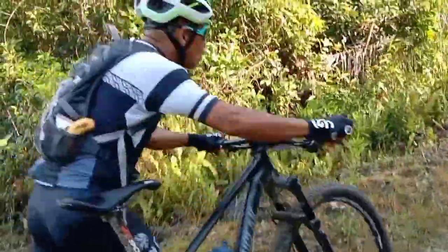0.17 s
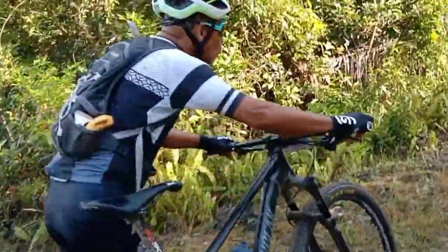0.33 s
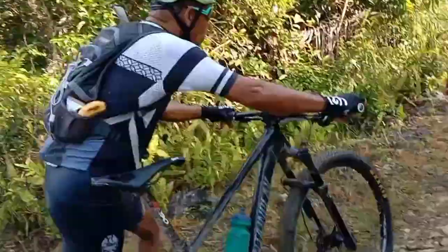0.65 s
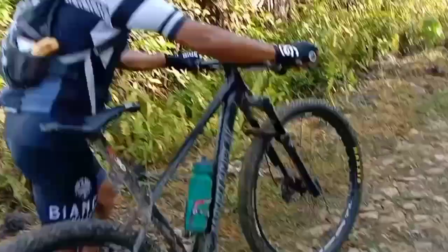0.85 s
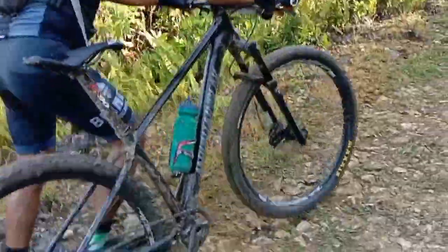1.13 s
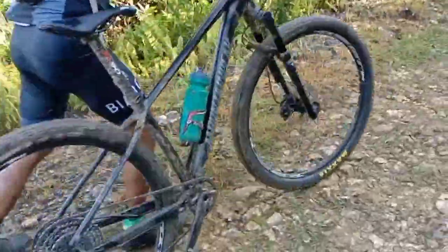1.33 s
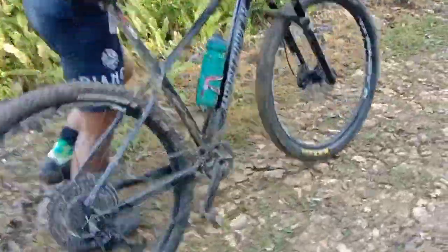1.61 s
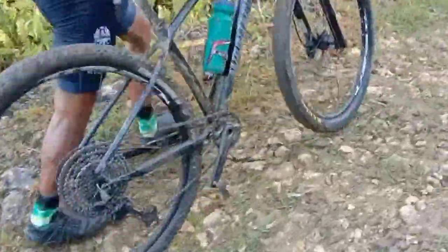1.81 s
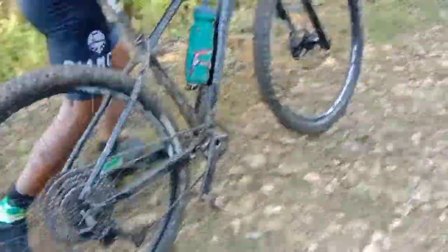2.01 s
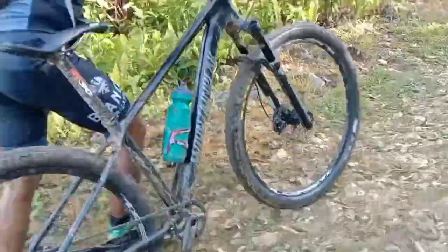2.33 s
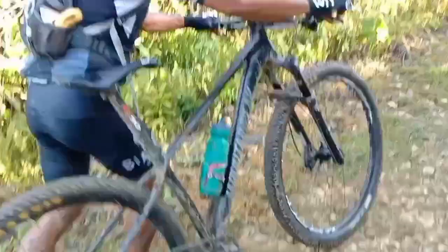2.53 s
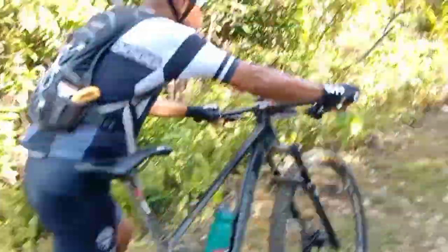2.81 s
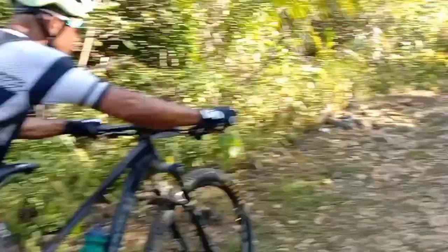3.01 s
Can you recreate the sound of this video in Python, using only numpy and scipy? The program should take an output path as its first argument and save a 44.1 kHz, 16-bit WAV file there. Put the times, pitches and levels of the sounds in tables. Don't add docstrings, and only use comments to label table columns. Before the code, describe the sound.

A bicycle freewheel clicks steadily and close from the start, bright and metallic, with small stones crunching, a few knocks and one loud rock crack near two seconds, over insect hiss outdoors.

```python
import sys
import numpy as np
from scipy import signal
from scipy.io import wavfile

SR = 44100
rng = np.random.default_rng(int(sys.argv[2]) if len(sys.argv) > 2 else 0)


def boost(x):
    u = np.asarray(x, float) / 20
    return 10 ** u


def to_wav(sig):
    pcm = np.clip(np.atleast_2d(sig), -1, 1) * 32767
    pcm = np.round(pcm).astype(np.int16)
    wavfile.write(sys.argv[1], SR, pcm.T)


N = 138915
GRAIN = 4096


def rms_one(x):
    return x / np.sqrt(np.mean(x ** 2) + 1e-20)


def butter(x, order, hz, kind):
    return signal.sosfilt(signal.butter(order, hz, kind, fs=SR, output="sos"), x)


def drift(rate):
    r = np.exp(-80 * np.pi * rate / SR)
    slow = signal.lfilter([1], [1, -2 * r, r * r], rng.standard_normal(N // 40 + 2002))[2000:]
    return np.interp(np.arange(N) / 40, np.arange(len(slow)), rms_one(slow))


def pole(x, tau_s):
    return signal.lfilter([1], [1, -np.exp(-1 / (max(tau_s, 2e-5) * SR))], x + 1e-18)


def burst(s, db, rise_s, fall_s):
    clicks = np.zeros(N)
    np.add.at(clicks, (np.asarray(s) * SR).astype(int), boost(db))
    return np.abs(pole(clicks, fall_s) - pole(clicks, min(rise_s, 0.5 * fall_s)))


def crunch(noise, rise_s, fall_s):
    t = np.arange(len(noise)) / SR
    return noise * (np.exp(-t / fall_s) - np.exp(-t / min(rise_s, 0.5 * fall_s)))


def place(out, s, db, sound):
    start = int(s * SR)
    out[start:start + GRAIN] += boost(db) * sound / np.abs(sound).max()


def peak(x, hz, width_hz):
    r = np.exp(-np.pi * width_hz / SR)
    top = np.array([1, 0, -1]) * (1 - r * r) / 2
    return signal.lfilter(top, [1, -2 * r * np.cos(2 * np.pi * hz / SR), r * r], x)


def ring(x, hz, t60):
    r, w = boost(-60 / (t60 * SR)), 2 * np.pi * hz / SR
    return signal.lfilter([0, np.sin(w)], [1, -2 * r * np.cos(w), r * r], x + 1e-18)


def coloured(spectrum, patchy_db):
    hz, db = np.transpose(spectrum)
    white, shared = rng.standard_normal((2, N + 8192)), drift(12)
    edges = np.geomspace(hz[0], hz[-1], int(4 * np.log2(hz[-1] / hz[0])) + 2)
    out = 0
    for k, (low, high) in enumerate(zip(edges, edges[1:])):
        band = butter(white[k % 2], 3, [low, high], "band")[8192:]
        level_db = np.interp(np.log(low * high) / 2, np.log(hz), db)
        out = out + band * boost(level_db + patchy_db * (1.1 * shared + drift(9.0)))
    return rms_one(out)


def struck(modes, t60, s, db, rise_s, fall_s):
    scatter_db = 4.5 * rng.standard_normal((len(s), len(modes)))
    chatter = rng.standard_normal(N) * boost(3.8 * drift(150)) / np.sqrt(fall_s * SR / 2)
    out = np.zeros(N)
    for k, (hz, level_db) in enumerate(modes):
        blows = burst(s, db + level_db + scatter_db[:, k], rise_s, fall_s)
        out += ring(chatter * blows, hz, t60)
    return out


# f/Hz, level/dB [per Hz]
AIR = [(22, -32), (60, -14), (110, -5), (300, -8.5), (800, -11), (2000, -6.5), (3200, -20.5), (4300, -16)]
# f/Hz, level/dB [per Hz]
CHORUS = [(4400, -54), (5100, 1), (7000, 6), (8500, -3.5), (10500, -5), (16000, -18)]


def air():
    return boost(-62) * coloured(AIR, patchy_db=1.7) + boost(-49.5) * coloured(CHORUS, patchy_db=2.8)


# t/s, level/dB
INSECTS = [
    (0, -49),
    (1.1, -50.5),
    (1.5, -61),
    (2.3, -64),
    (3.15, -56),
]


def insects():
    high_hz, low_hz, width_hz = 7660, 5690, 240
    s, db = np.transpose(INSECTS)
    high, low = (rms_one(peak(peak(rng.standard_normal(N), hz, width_hz), hz, width_hz))
                 for hz in (high_hz, low_hz))
    high_db = np.interp(np.arange(N) / SR, s, db) + 2.5 * drift(34)
    return high * boost(high_db) + low * boost(-58.5 + 3 * drift(30))


# t/s, peak level/dB, rim level/dB [relative], rim f/Hz
TICKS = [(0.026, -17, -22, 2773), (0.1054, -13, -26, 3250), (0.1766, -17, -20.5, 1980),
         (0.2495, -15, -20, 2210), (0.3177, -14.5, -22.5, 2770), (0.3882, -13.5, -28.5, 2540),
         (0.4504, -15.5, -26.5, 2690), (0.506, -16, -23, 2240), (0.562, -16, -21, 3060),
         (0.6275, -16.5, -21.5, 2270), (0.6971, -16.5, -24.5, 2687), (0.7722, -16.5, -23.5, 2146),
         (0.845, -15.5, -22, 2193), (0.928, -17.5, -22.5, 3070), (1.022, -15, -27, 2243),
         (1.1165, -16.5, -25.5, 2660), (1.197, -15, -25.5, 3270), (1.2834, -14.5, -38.5, 2650),
         (1.3603, -16.5, -30, 2660), (1.4278, -14.5, -24.5, 2335), (1.5, -13.5, -30, 2625),
         (1.574, -16.5, -22, 2240), (1.6511, -11.5, -36, 2920), (1.7379, -13.5, -31, 2310),
              (1.8242, -14.5, -25, 2180), (1.91, -13.5, -28.5, 3480), (1.9941, -13, -29.5, 2760),
              (2.0772, -14.5, -23.5, 2740), (2.168, -13.5, -27, 2560), (2.268, -16.5, -29, 2240),
              (2.3585, -18.5, -20, 3200), (2.4474, -16, -42, 2180), (2.5222, -16, -25.5, 3220),
              (2.594, -15, -29.5, 2330), (2.6599, -13.5, -21, 2296), (2.7359, -18.5, -23, 2870),
              (2.8176, -17, -22, 2300), (2.9021, -15.5, -23.5, 2294), (2.989, -15.5, -22, 3090),
              (3.081, -16, -23.5, 2960)]
# t/s, peak level/dB
DRAGS = [(0.134, -47), (0.298, -27.5), (0.423, -47), (0.53, -31), (0.601, -23.5), (0.664, -24.5),
         (0.748, -25.5), (.875, -34), (.950, -53), (1.051, -25), (1.228, -36), (1.264, -29), (1.402, -31),
         (1.599, -41), (1.63, -26), (1.81, -28), (1.867, -26), (1.963, -27.5), (2.062, -24), (2.190, -56),
         (2.347, -26.5), (2.424, -30), (2.508, -24), (2.637, -47), (2.75, -55), (2.863, -28), (2.880, -37),
         (3.105, -47)]
# t/s, peak level/dB
REBOUNDS = [(.007, -31.5), (0.069, -26), (.136, -22.5), (0.2, -24), (.210, -26), (0.265, -23.5),
            (0.289, -34), (0.446, -25), (0.525, -26), (0.614, -23), (.720, -38), (.739, -31),
            (0.878, -33.5), (.947, -30), (.969, -54), (1.067, -32), (1.146, -29), (1.323, -33),
            (1.513, -40), (1.601, -24), (1.681, -27), (1.691, -28.5), (1.774, -27.5), (1.874, -34),
            (1.931, -31), (1.973, -27), (2.109, -31), (2.189, -37), (2.544, -33), (2.639, -26),
            (2.75, -19.5), (2.865, -30), (2.881, -33), (2.956, -27), (2.976, -24), (3.031, -30),
            (3.106, -23.5)]
# f/Hz, level/dB
HUB = [(5150, 0), (5600, 2), (6300, -3), (6950, 8), (7400, -3), (9550, 9), (11200, 6), (13400, -3),
       (13990, 4), (14700, -3)]
# f/Hz, level/dB
RIM = [(2230, 6.5), (2680, 1.5), (3200, -5.5), (3750, 0.5)]
# f/Hz, level/dB [per Hz]
CRACK = [(1500, -46), (3500, -12), (4500, -66), (5050, -0.5), (7000, 4), (10500, -1), (14200, 5),
         (16000, 5.5)]


def freewheel():
    snap_rise_s, snap_fall_s, drag_rise_s, drag_fall_s = 0.00029, 0.0043, 0.0019, 0.012
    rim_rise_s, rim_fall_s, rebound_fall_s = 0.0023, 0.013, 0.0046
    crack_db, hub_db, hub_t60_s, spoke_width_hz = -10.5, -29, 0.03, 45
    s, db, rim_db, rim_hz = np.transpose(TICKS)
    drag_s, drag_db = np.transpose(DRAGS)
    again_s, again_db = np.transpose(REBOUNDS)

    shape = burst(s, db + crack_db, snap_rise_s, snap_fall_s)
    shape += burst(s, db - 25, snap_rise_s, 0.027)
    shape += burst(drag_s, drag_db + crack_db, drag_rise_s, drag_fall_s)
    shape += burst(again_s, again_db + crack_db, snap_rise_s, rebound_fall_s)
    crack = shape * boost(1.5 * drift(200)) * coloured(CRACK, patchy_db=0.7)

    hub = struck(HUB, hub_t60_s, s, db + hub_db, snap_rise_s, snap_fall_s)
    hub += struck(HUB, hub_t60_s, drag_s, drag_db + hub_db, drag_rise_s, drag_fall_s)
    rim = struck(RIM, 0.061, s, db + rim_db - 10.5, rim_rise_s, rim_fall_s)

    spokes = np.zeros(N + GRAIN)
    for start, level_db, hz, noise in zip(s, db + rim_db - 5, rim_hz, rng.standard_normal((len(s), GRAIN))):
        shake = peak(crunch(noise, rim_rise_s, rim_fall_s), hz, spoke_width_hz)
        place(spokes, start, level_db, peak(shake, hz, 3 * spoke_width_hz))

    grain = rms_one(butter(rng.standard_normal(N), 3, [1760, 3800], "band"))
    shakes = burst(s, db + rim_db - 13, rim_rise_s, 0.011)
    shakes += burst(again_s, again_db - 22.5, snap_rise_s, 2 * rebound_fall_s)
    body = grain * boost(2.4 * drift(100)) * shakes
    return butter(crack + hub + rim + spokes[:N] + body, 3, 1500, "high")


# t/s, peak level/dB, contact brightness f/Hz, bounce delay t/s, bounce level/dB
KNOCKS = [
    (.201, -14, 2400, 0.0051, -0.5),
    (0.7328, -10.5, 1730, 0.0055, -10.5),
    (1.932, -1.5, 5900, 0.001767, -16),
]
KNOCK_LOWS_HZ = (326, 260, 600)
# f/Hz, level/dB, t60/s
SHOE = [(300, -17, 0.035), (520, -42, 0.13), (730, 11.5, 0.021), (1000, 12.5, 0.019), (1166, 12.5, 0.033),
        (2095, 4.5, 0.034)]
TYRE = [(440, -38, 0.017), (530, 10.5, 0.015), (794, -4, 0.02), (1055, 10.5, 0.015), (1190, -32, 0.057),
        (2000, -39, 0.013)]
ROCK = [(310, -9.5, 0.063), (600, -18.5, 0.075), (1100, -22, 0.0053), (1384, 1.5, 0.0097),
        (1830, -2, 0.013), (2430, -6, 0.0081), (3250, 2.5, 0.0036), (4610, 4, 0.0035), (5600, -12, 0.0023)]


def knocks():
    rattle_s, lead_s = 0.0013, 0.0098
    per_contact = np.sqrt(rattle_s * SR)
    out = np.zeros(N)
    for (s, db, top_hz, bounce_s, bounce_db), body, low_hz in zip(KNOCKS, (SHOE, TYRE, ROCK), KNOCK_LOWS_HZ):
        rub = burst([s], [-14.5], 0.00054, rattle_s) + burst([s - lead_s], [-17.5], 0.0019, lead_s)
        force = rng.standard_normal(N) / per_contact * rub
        dull = pole(rng.standard_normal(N), 0.000077) / per_contact
        force += dull * burst([s], [-19.5], 0.0039, 0.01)
        force[int(s * SR)] -= 1
        force[int((s + bounce_s) * SR)] += boost(bounce_db)
        sound = sum(boost(level_db) * ring(force, hz, t60) for hz, level_db, t60 in body)
        thump = boost(-40) * pole(sound, 0.0028) / 20
        sound = butter(sound, 3, [low_hz, top_hz], "band") + thump
        out += boost(db) * sound / np.abs(sound).max()
    return out


# t/s, peak level/dB, f/Hz
THUDS = [(.2, -55, 151), (0.254, -50.5, 161), (0.304, -49, 129), (0.446, -46.5, 149), (0.731, -42.5, 113),
         (1.181, -51.5, 170), (1.301, -57, 141), (1.358, -52, 181), (1.412, -50.5, 179), (1.487, -56, 225),
         (2.059, -48.5, 260), (2.195, -55, 200), (2.43, -47.5, 119), (2.975, -50.5, 205), (2.864, -53, 91),
         (2.884, -54, 93), (2.211, -60, 80.5), (1.849, -56.5, 260)]
# t/s, peak level/dB, f/Hz
PEBBLES = [
    (1.178, -36, 3220),
    (1.604, -20, 5070),
    (2.212, -46, 2500),
    (2.9351, -18.5, 2780),
]


def ground():
    out, t = np.zeros(N + GRAIN), np.arange(GRAIN) / SR
    for s, db, hz in THUDS:
        push = crunch(np.sin(2 * np.pi * hz * t), 0.00067, 0.0048)
        place(out, s, db, peak(push, hz, 4.5 * hz))
    for s, db, hz in PEBBLES:
        snap = ring(1 * (t == 0), hz, 4.5 / hz)
        place(out, s, db, peak(peak(snap, hz, hz), hz, hz))
    return out[:N]


# t/s, peak level/dB, f/Hz, fall t/s
STONES = [(0.302, -34, 1290, 0.011), (.446, -40.5, 247, 0.0059), (0.545, -44, 1030, 0.0032),
          (0.974, -48.5, 300, 0.0041), (0.99, -37, 1450, 0.0071), (1.174, -45, 1100, 0.011),
          (1.362, -44, 300, 0.0027), (1.411, -49.5, 330, 0.0064), (1.587, -44, 1100, 0.032),
          (1.652, -41.5, 1460, 0.017), (1.849, -50.5, 487, 0.0022), (1.965, -33.5, 790, 0.0027),
          (2.195, -31.5, 1284, 0.0076), (2.208, -34, 1280, 0.004), (2.427, -39.5, 495, 0.0047),
          (2.506, -34.5, 1740, 0.0024), (2.856, -38, 1300, 0.017), (2.936, -35, 2180, 0.014),
          (3.02, -49, 1640, 0.064), (0.439, -39.5, 1023, 0.0037), (1.947, -38.5, 3580, 0.027),
          (2.97, -40, 1050, 0.023), (2.986, -38, 528, 0.007), (.25, -42, 1680, 0.016),
          (.422, -37, 2180, 0.0068), (.585, -54.5, 734, 0.039), (.816, -51, 1400, 0.0065),
          (.94, -42, 1640, 0.017), (1.045, -39.5, 2220, 0.013), (1.085, -46, 2400, 0.0055),
          (1.22, -52, 660, 0.018), (1.603, -42, 3200, 0.0096), (1.774, -53, 2300, 0.0029),
          (1.948, -38, 1100, 0.013), (2.053, -49.5, 1300, 0.032), (2.45, -44.5, 1730, 0.081),
          (2.75, -38, 2800, 0.005), (2.52, -41, 1090, 0.0037), (1.965, -36, 2530, 0.0081),
          (1.933, -27, 5230, 0.01), (2.744, -46, 1420, 0.0089), (.61, -52.5, 530, .01)]


def stones():
    out = np.zeros(N + GRAIN)
    for (s, db, hz, fall_s), noise in zip(STONES, rng.standard_normal((len(STONES), GRAIN))):
        rub = crunch(noise, 0.0026, fall_s)
        narrow = peak(peak(rub, hz, max(hz / 11.6, 120)), hz, hz + 220)
        broad = butter(rub, 2, [max(90, hz / 5), 2.2 * hz], "band")
        start = int(s * SR)
        sound = narrow / np.abs(narrow).max() + boost(-6.5) * broad / np.abs(broad).max()
        out[start:start + GRAIN] += boost(db) * sound
    born = rng.random(N) < 37 * boost(5.0 * drift(3)) / SR
    ticks = born * boost(6.6 * np.minimum(rng.exponential(1, N), 4))
    dealt = rng.integers(0, 12, N)
    pitches = np.geomspace(450, 3500, 12)
    grit = sum(ring(ticks * (dealt == k), hz, 17.0 / hz) for k, hz in enumerate(pitches))
    return out[:N] + boost(-72) * grit


def scene():
    return (air() + insects() + freewheel() + knocks() + ground() + stones())[None, :]


def top_cut(x):
    return signal.sosfilt(signal.butter(12, 16640, fs=SR, output="sos"), x)


def record(dry):
    cutoff_hz = 15700
    dry = butter(dry, 2, 55, "high")
    dry = signal.sosfilt(signal.cheby2(12, 50, cutoff_hz + 950, fs=SR, output="sos"), dry)
    cut = signal.sosfilt(signal.ellip(8, 0.3, 60, cutoff_hz, fs=SR, output="sos"), dry)
    return top_cut(cut + boost(-37.5) * (dry - cut))


dry = scene()
out = record(dry)
to_wav(out)
```